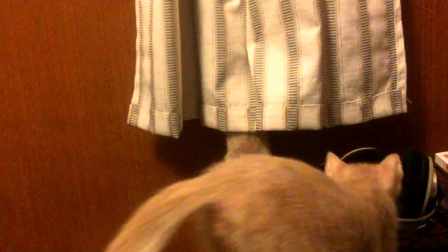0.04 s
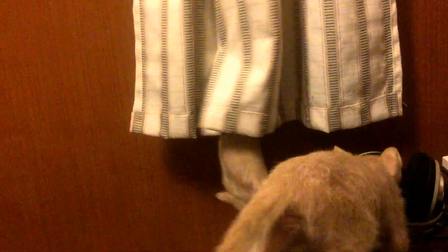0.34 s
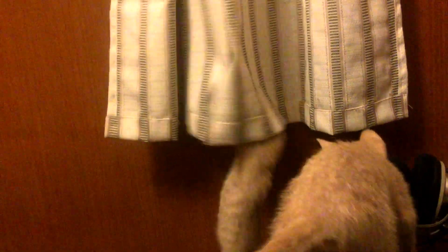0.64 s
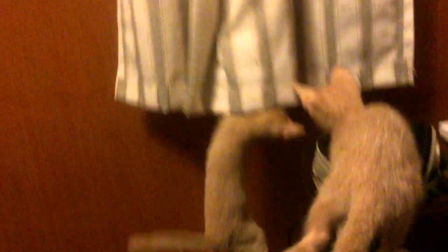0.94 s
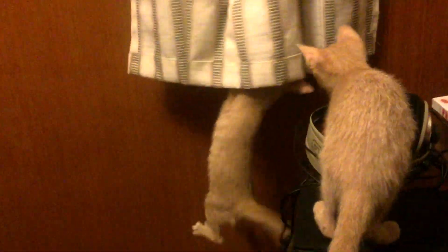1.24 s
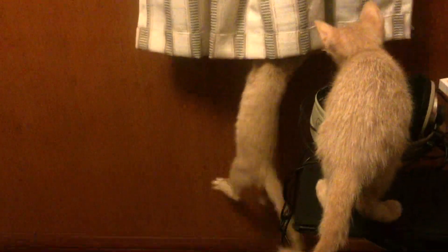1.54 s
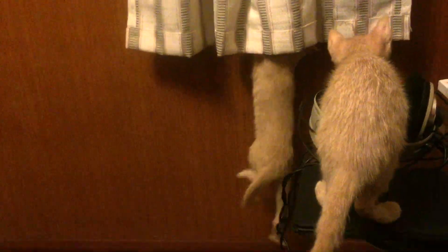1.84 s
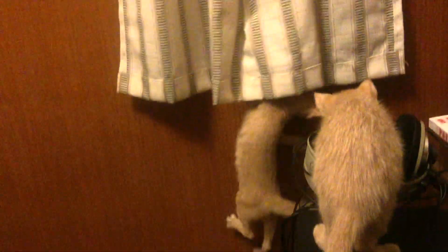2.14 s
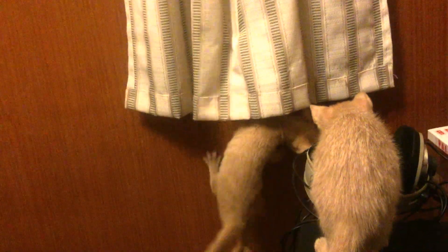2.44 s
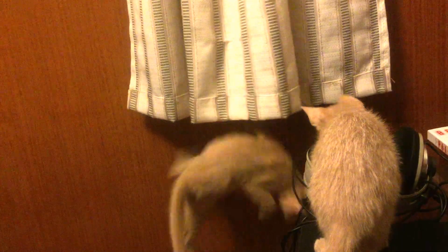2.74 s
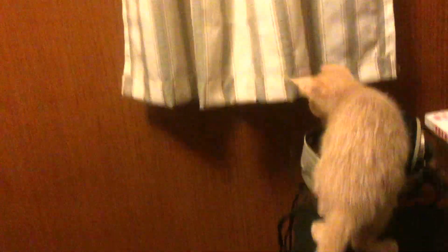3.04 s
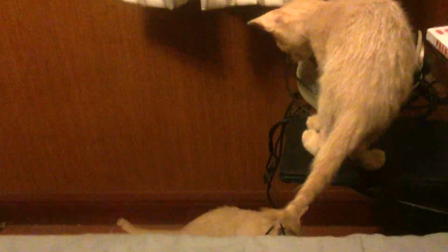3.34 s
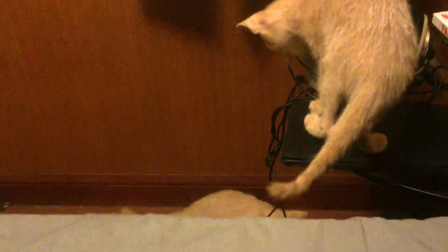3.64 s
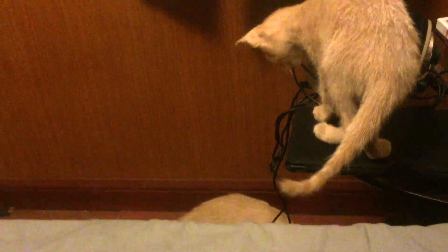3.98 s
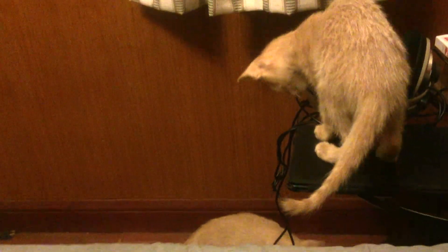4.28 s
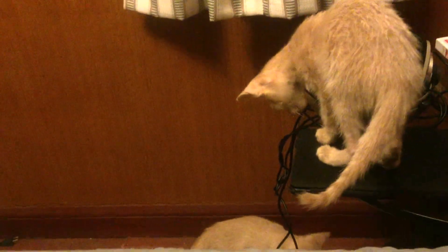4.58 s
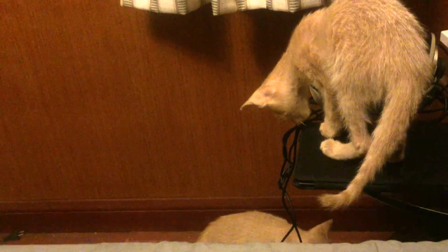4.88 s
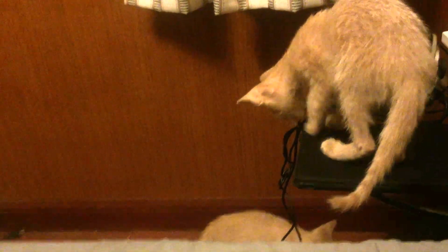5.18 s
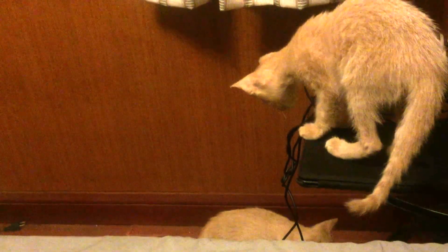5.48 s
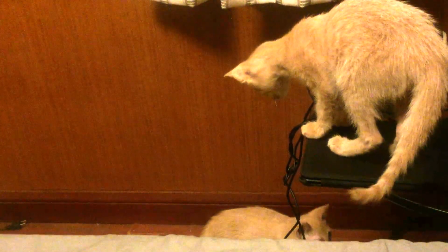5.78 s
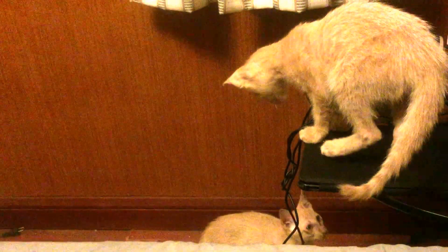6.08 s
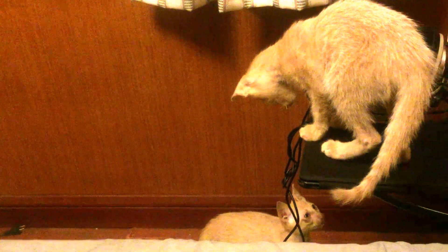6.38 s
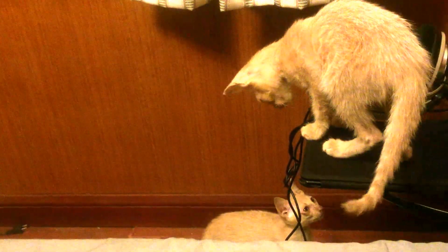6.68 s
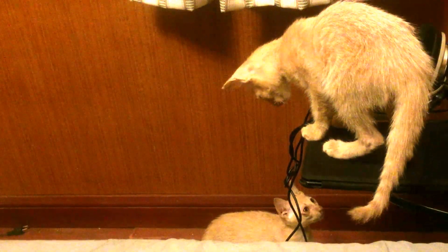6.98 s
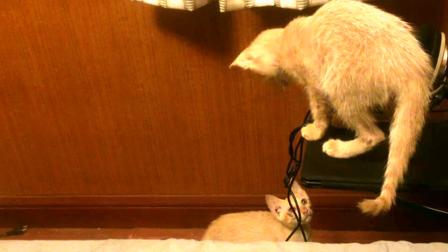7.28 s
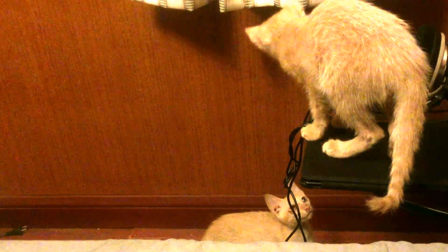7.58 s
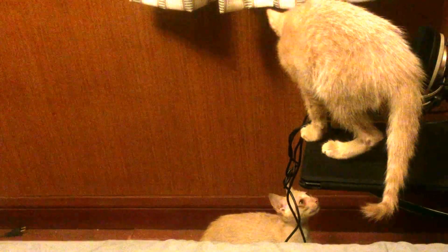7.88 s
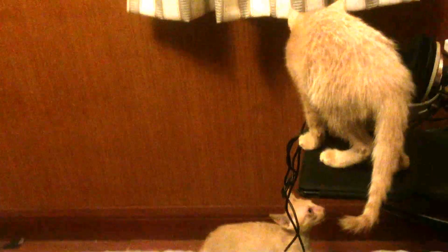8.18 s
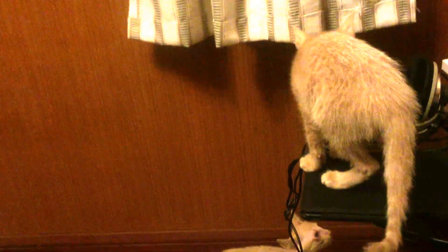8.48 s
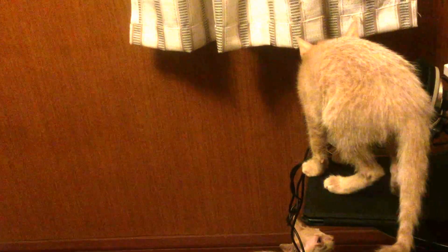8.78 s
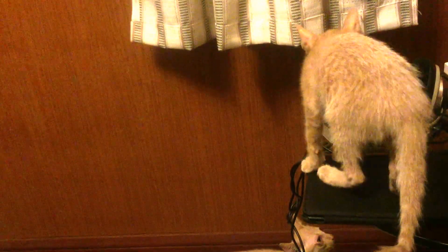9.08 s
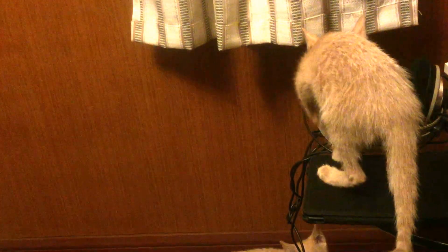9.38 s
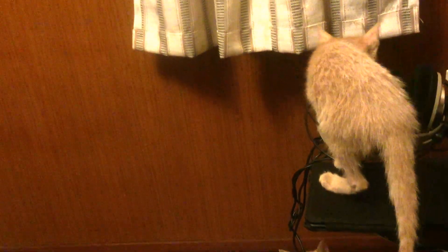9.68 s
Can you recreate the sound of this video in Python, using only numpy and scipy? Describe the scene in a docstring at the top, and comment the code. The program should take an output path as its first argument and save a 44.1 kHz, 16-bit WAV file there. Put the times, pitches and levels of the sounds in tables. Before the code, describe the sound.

A kitten's claws pluck and rip at a curtain, it thuds onto floorboards, and a cat later gives one faint trill in a quiet room.

```python
"""A small room hums. A paw pads on the floor, fur rustles, and a kitten hangs from a curtain in front
of a wooden door: its body bumps the door, its claws pluck threads and rip along the cloth, and small
dry ticks sound close by. At about 3 s it lets go and thuds down, ringing the floorboards. At 5.6 s a
cat gives one soft rising trill, a tone chopped by a flutter in its throat, then shifts about."""
import sys
import numpy as np
from scipy import signal
from scipy.fft import rfft, irfft
from scipy.io import wavfile

SR = 44100
rng = np.random.default_rng(int(sys.argv[2]) if len(sys.argv) > 2 else 0)


def wav_record(signal):
    """Record a signal, one row per channel, as 16-bit PCM in the file named by sys.argv[1]."""
    frames = np.transpose(np.atleast_2d(signal))
    bounded = np.clip(frames, -1, 1)
    # unit amplitude maps onto the largest positive 16-bit level
    quanta = np.round(bounded * 32767).astype(np.int16)
    wavfile.write(sys.argv[1], SR, quanta)


N = 433503
TIME = np.arange(N) / SR


def gain_of(db):
    """Decibels to amplitude."""
    return 10 ** (np.asarray(db) / 20)


def unit_rms(x):
    """Scales to rms 1."""
    return x / np.sqrt(np.mean(x ** 2) + 1e-20)


def curve_at(points, hz, peaks=()):
    """Reads a curve on a log-frequency axis, with peaks and dips on top."""
    point_hz, value = np.transpose(points)
    bumps = sum(db / (1 + (2 * (hz - centre) / width) ** 2) for centre, width, db in peaks)
    return np.interp(np.log(hz + 1), np.log(point_hz + 1), value) + bumps


def add(mix, start, sound):
    """Lays a sound into the mix at a start in seconds."""
    part = mix[round(start * SR):][:len(sound)]
    part += sound[:len(part)]


def eq_impulse(points, peaks=(), size=4096):
    """The minimum-phase impulse response of an EQ curve."""
    hz = abs(np.fft.fftfreq(size, 1 / SR))
    log_gain = np.log(gain_of(curve_at(points, hz, peaks)))
    return np.fft.ifft(np.exp(np.conj(signal.hilbert(log_gain)))).real[:size // 2]


def through(x, impulse):
    """Convolves and keeps the length."""
    return signal.fftconvolve(x, impulse)[:len(x)]


def band(x, low_hz, high_hz):
    """Band-pass."""
    edges = [low_hz, min(high_hz, .45 * SR)]
    return signal.sosfilt(signal.butter(2, edges, "band", fs=SR, output="sos"), x)


# Rumble and hiss. Each row: frequency in Hz, level in dB per Hz.
AIR_EQ = [(20, -114), (38, -102), (52, -90), (82, -87), (130, -98.5), (280, -103), (500, -109),
          (1100, -112), (2800, -110), (4800, -114.5), (7200, -119.5), (9000, -118.5), (12000, -122.5),
          (15500, -125)]
# Peaks and dips in the hiss. Each row: centre in Hz, width in Hz, gain in dB.
HISS_PEAKS = [(3600, 160, -2.5), (4070, 150, 6.5), (4950, 400, -8.5), (5470, 790, 11), (10230, 640, -2)]
# Two motors, the slower with an overtone. Each row: frequency in Hz, rms level in dB.
MOTOR_HUM = [(86.7, -69), (100, -70), (173.4, -91)]
def room_tone(drift=0.092):
    """The bed: room rumble, thin microphone hiss and two motors beating against each other."""
    air = through(rng.standard_normal(N), eq_impulse(AIR_EQ, HISS_PEAKS, size=16384)) * np.sqrt(SR / 2)
    knots = np.linspace(0, TIME[-1], 40)
    hum = np.zeros(N)
    for hz, db in MOTOR_HUM:
        phase = np.interp(TIME, knots, 2 * drift * rng.standard_normal(len(knots)))
        wobble = np.interp(TIME, knots, 1 + drift * rng.standard_normal(len(knots)))
        hum += gain_of(db) * np.sqrt(2) * np.sin(2 * np.pi * hz * TIME + phase) * wobble
    return air + hum


def thud(modes, db, hard_hz, scuff_db, ring_share=0.88, scuff_s=0.0099, rise_s=0.0043):
    """A padded blow rings the wood's modes, rolled off above hard_hz, with a short scuff of fur."""
    t = TIME[:SR // 2]
    ring = np.zeros(len(t))
    for hz, mode_db, t60 in modes:
        decay = gain_of(mode_db - 60 * t / (t60 * ring_share))
        ring += decay * np.sin(2 * np.pi * hz * t) / (1 + (hz / hard_hz) ** 2)
    scuff = unit_rms(band(rng.standard_normal(len(t)), 238, 1015)) * np.exp(-t / scuff_s)
    return gain_of(db) * ring * (1 - np.exp(-t / rise_s)) + gain_of(scuff_db) * scuff


# The ring of the boards. Each row: frequency in Hz, gain in dB, t60 in seconds.
FLOOR_MODES = [(65.5, -16, 0.36), (83.6, -12.5, 0.16), (107.2, -6, 0.21), (141.4, -4, 0.22),
               (209.3, -6, 0.23), (268, -9, 0.19), (289.3, -1.5, 0.2), (334, -11, 0.15), (420, -9.5, 0.23),
               (537, -13.5, 0.12), (630, -23.5, 0.21), (860, -10, 0.055)]
# Hits on the floor. Each row: start in seconds, gain in dB, hardness in Hz, scuff in dB,
# share of the ring time (a resting paw damps the boards).
FLOOR_HITS = [(.118, -43.5, 600, -59.5, 0.32), (3.066, -47, 900, -48, 0.8), (3.081, -15.5, 75, -44.5, .9),
              (3.1068, -21.5, 800, -38.5, 0.9), (3.1195, -15, 330, -45.5, 0.5),
              (3.143, -32, 300, -53, 0.89), (3.177, -55, 250, -54, .43), (3.346, -29.5, 600, -44.5, 0.18),
              (3.354, -19.5, 252, -76, 0.063), (3.722, -38, 242, -77, 0.17), (6.03, -47, 350, -57.5, 0.44),
              (7.913, -57, 600, -65.5, .6), (7.946, -52.5, 550, -70, 0.66), (8.133, -64, 900, -62.5, 0.76),
              (9.73, -60, 299, -77, 0.86)]
def floor_thuds():
    """Paws and body strike the floorboards: light steps and one heavy landing."""
    out = np.zeros(N)
    for start, *hit in FLOOR_HITS:
        add(out, start, thud(FLOOR_MODES, *hit))
    return out


def fibre_slips(count, fibres_per_s=5000, catches_per_s=130, catch_db=14, rub=0.31, clump_db=0.6):
    """Raw friction: fibres slip in little clumps, and now and then a whole thread gives way."""
    chance, noise = rng.random(SR)[:count], rng.standard_normal(SR)[:count]
    sizes = gain_of(np.minimum(rng.exponential(1, SR)[:count], 4))
    clumps = np.clip(unit_rms(band(rng.standard_normal(SR), 25.04, 200)), -2, 2)[:count]
    grains = unit_rms(np.sign(noise) * sizes * (chance < fibres_per_s / SR))
    friction = unit_rms((grains + rub * noise) * gain_of(-clump_db * clumps))
    catches = gain_of(catch_db) * np.sign(noise) * (chance < catches_per_s / SR)
    return unit_rms(friction + catches)


def scrape(length, db, swell_db, from_hz, to_hz, skirt_db, eq, peaks=(),
           attack_s=0.0046, release_db_per_s=599, arch_db=1):
    """Slipping fibres rasp in a band that glides with the stroke's speed; it bites and stops fast."""
    t = TIME[:SR // 3]
    progress = np.minimum(t / length, 1)
    level_db = db - swell_db * (1 - progress) - arch_db * (2 * progress - 1) ** 2
    level_db -= release_db_per_s * np.maximum(t - length, 0)
    centre_hz = from_hz * (to_hz / from_hz) ** (progress ** 2.1)  # holds at first, glides late
    hz, frame_s, spectra = signal.stft(fibre_slips(len(t)), SR, nperseg=256)
    octaves = np.log2((hz[:, None] + 50) / np.interp(frame_s, t, centre_hz))
    sweep = gain_of(-skirt_db * np.hypot(octaves, .5))
    colour = gain_of(curve_at(eq, hz, peaks))[:, None]
    sweep /= np.sqrt(np.mean((sweep * colour) ** 2, axis=0))  # even power along the glide
    rasp = signal.istft(spectra * sweep, SR)[1][:len(t)]
    return through(rasp, eq_impulse(eq, peaks)) * gain_of(level_db) * (1 - np.exp(-t / attack_s))


# The colour of fur. Each row: frequency in Hz, gain in dB.
FUR_EQ = [(120, -5), (250, 8.5), (550, 10), (800, -2.5), (1200, -3), (2500, 0.5), (4500, -7.5),
          (6500, -3.5), (8000, -17), (16000, -22)]
# Faint movements. Each row: start in seconds, length in seconds, midway level in dB, centre in Hz.
FUR_RUSTLES = [(0.39, 0.028, -58.5, 3300), (0.486, 0.15, -69.5, 3440), (4.524, 0.099, -73, 1300),
               (8.017, 0.043, -70, 2000), (8.548, 0.03, -58.5, 2730), (8.633, 0.061, -67.5, 2300),
               (8.64, .1, -72.5, 550), (8.886, 0.024, -62, 2670), (9.633, 0.068, -70.5, 2500)]
def fur_rustles(fade_db=6, skirt_db=8.5):
    """Fur brushes as the cats shift, each rustle dying away at a steady pitch."""
    out = np.zeros(N)
    for start, length, db, hz in FUR_RUSTLES:
        add(out, start, scrape(length, db - fade_db / 2, -fade_db, hz, hz, skirt_db, FUR_EQ))
    return out


# The ring of the door. Each row: frequency in Hz, gain in dB, t60 in seconds.
DOOR_MODES = [(60.3, -1.5, 0.1318), (81.1, -2.5, 0.313), (102.3, -5, 0.12), (146, -21.5, 0.19),
              (221, -11, 0.17), (252, -14.5, 0.09), (310.8, -18, 0.087)]
# Hits on the door. Each row: start in seconds, gain in dB, hardness in Hz, scuff in dB.
DOOR_HITS = [(.393, -47.5, 300, -51), (0.639, -33.5, 110, -76), (.661, -38, 240, -72),
             (1.56, -49, 150, -67), (1.6, -47.5, 250, -60), (1.978, -38.5, 80, -84),
             (2.003, -33.5, 90, -71), (2.063, -45.5, 140, -80), (2.818, -43.5, 890, -46),
             (8.422, -44, 80, -75), (9.615, -51, 100, -80)]
def door_bumps():
    """A soft body bumps the wooden door, which answers with a low boom."""
    out = np.zeros(N)
    for start, *hit in DOOR_HITS:
        add(out, start, thud(DOOR_MODES, *hit))
    return out


# Claw catches. Each row: start in seconds, ring peak in dB, ring pitch in Hz, ring t60 in seconds,
# crack peak in dB.
CLAW_SNAGS = [(.3931, -36.5, 660, 0.0015, -28), (.615, -36, 1120, 0.017, -56),
              (0.7658, -28.5, 1560, .009, -38), (0.7754, -27, 2220, 0.0046, -20),
              (.873, -33.5, 3130, 0.0069, -26), (1.5959, -46.5, 1180, .016, -43),
              (2.1061, -23.5, 1400, 0.0084, -35), (2.239, -38, 3200, 0.0087, -43),
              (2.527, -36, 1460, 0.017, -50), (2.573, -33, 1350, .012, -56),
              (2.7023, -36, 1314, 0.018, -47), (2.816, -23.5, 326, 0.0093, -17.5),
              (2.8194, -45, 700, .0075, -26.5), (3.3445, -34.5, 3680, 0.0015, -43.5)]
def claw_snags(crack_s=0.0012, fray=0.64, rise_s=0.00052):
    """A claw plucks a thread of the taut cloth or clicks on wood: a crack and a brief ring."""
    t = TIME[:4096]
    out = np.zeros(N)
    for start, ring_db, hz, t60, crack_db in CLAW_SNAGS:
        ring = np.sin(2 * np.pi * hz * t) * gain_of(-60 * t / t60) * (1 - np.exp(-t / rise_s))
        fraying = fray * rng.standard_normal(len(t)) * np.exp(-t / crack_s)
        crack = band((t == 0) + fraying, 1100, 9300)
        add(out, start, gain_of(ring_db) * ring / abs(ring).max())
        add(out, start, gain_of(crack_db) * crack / abs(crack).max())
    return out


# The colour of the cloth. Each row: frequency in Hz, gain in dB.
CLOTH_EQ = [(150, -11), (400, -8.5), (620, -1.5), (800, -13.5), (1050, 4.5), (2000, -0.5), (3300, -1.5),
            (4500, -3), (6200, -0.5), (7300, -5.5), (8500, 0.5), (10300, -5.5), (12500, -2.5),
            (16000, -7.5)]
# Resonances and dips under the claws. Each row: centre in Hz, width in Hz, gain in dB.
CLOTH_RESONANCES = [(1120, 60, -1), (1300, 180, 3.5), (1470, 100, 2), (1750, 23, -2.5), (2856, 83, 8.5),
                    (3374, 76, 6.5), (3526, 60, 4), (6020, 258, -2)]
# Rips. Each row: start in seconds, length in seconds, level swelled to in dB, swell in dB, opening
# centre in Hz, closing centre in Hz, slope of the band's skirts in dB per octave, flap level in dB.
CLAW_STROKES = [(0.609, .11, -43, 3, 2550, 1980, 8.5, -45), (0.756, 0.11, -35, 6.5, 5100, 7650, 7, -37.5),
                (1.586, 0.017, -55.5, -2, 2600, 2880, 12, -62.5),
                (2.105, 0.087, -46, 5, 1530, 2660, 7.5, -49.5), (2.224, 0.016, -40, 6, 2700, 2870, 13, -60),
                (2.291, 0.052, -46.5, 1.5, 2930, 2970, 9.5, -59.5),
                (2.373, .075, -59, 5, 2350, 2000, 14, -77), (2.475, 0.11, -44.5, 5, 2040, 1140, 12.5, -68),
                (2.699, 0.046, -48.5, -0.5, 1900, 1600, 10, -53),
                (2.825, 0.057, -24, 19, 5460, 1580, 5, -55)]
def claw_rips(echo_s=0.00423, echo_db=-16):
    """Claws drag through the curtain and jerk it; returns the rasps and the flaps as two stems."""
    rasps, flaps = np.zeros((2, N))
    for start, *stroke, flap_db in CLAW_STROKES:
        rasp = scrape(*stroke, CLOTH_EQ, CLOTH_RESONANCES)
        add(rasps, start, rasp)
        add(rasps, start + echo_s, -gain_of(echo_db) * rasp)  # a near surface combs the rasp
        add(flaps, start, curtain_flap(flap_db))
    return rasps, flaps


# The low whump of the curtain. Each row: frequency in Hz, gain in dB.
FLAP_EQ = [(20, -43), (45, -5.5), (70, 2.5), (110, 0.5), (160, -13.5), (215, -1), (280, -9), (450, -19.5),
           (900, -22), (3000, -59.5)]
def curtain_flap(db, rise_s=0.011, fade_db_per_s=128):
    """The heavy cloth pushes air as a stroke jerks it, then settles."""
    t = TIME[:SR // 2]
    air = unit_rms(through(rng.standard_normal(len(t)), eq_impulse(FLAP_EQ)))
    return air * gain_of(db - fade_db_per_s * t) * (1 - np.exp(-t / rise_s))


# The colour of a thin shell. Each row: frequency in Hz, gain in dB.
SHELL_EQ = [(150, -39), (400, -6), (550, 3.5), (700, -15.5), (920, 7.5), (1200, -7.5), (1600, 2.5),
            (2400, -4), (2750, -20), (4500, -20.5), (12000, -33)]
# Close, dry ticks and knocks. Each row: start in seconds, peak in dB, treble limit in Hz.
CLOSE_TICKS = [(1.01, -51, 6000), (1.045, -57, 6000), (1.070, -57, 5960), (1.097, -52.5, 6000),
               (1.337, -52, 6000), (3.251, -34.5, 14000), (3.2713, -40.5, 8000), (3.3, -44, 4930),
               (3.385, -40.5, 4976), (3.546, -50, 5000), (3.755, -56.5, 3000), (4.507, -59, 4000),
               (4.526, -52.5, 3000), (5.31, -40.5, 5100), (6.022, -53, 750), (6.03, -56.5, 700),
               (6.064, -55, 750)]
def close_ticks(lag_s=0.0018, size=4096):
    """Ticks cross a thin shell as bending waves, treble first; softer contacts are duller."""
    hz = np.fft.rfftfreq(size, 1 / SR)
    dispersion = np.exp(-4j * np.pi * lag_s * np.sqrt(1000 * hz))  # lag_s is the delay at 1 kHz
    shell = irfft(rfft(eq_impulse(SHELL_EQ), size) * dispersion)[:size // 2]
    out = np.zeros(N)
    for start, db, limit_hz in CLOSE_TICKS:
        tick = band(shell, 100, limit_hz)
        add(out, start - lag_s / 4, gain_of(db) * tick / abs(tick).max())
    return out


# The envelope of the call. Each row: time in seconds, level in dB.
TRILL_ENVELOPE = [(5.6, -80), (5.626, -58.5), (5.654, -56.5), (5.814, -68), (5.844, -59.5), (5.858, -66),
                  (5.88, -84)]
def cat_trill(top_hz=528, dip_hz=396, dip_at_s=5.662, sag_s=0.0358, climb_s=0.083,
              flutter_hz=62, flutter_depth=0.53, jitter=0.055, open_db=14, shut_db=24):
    """A closed-mouth call: a nearly pure tone dips and rises, chopped by a flutter in the throat."""
    times, level_db = np.transpose(TRILL_ENVELOPE)
    t = np.arange(times[0], times[-1], 1 / SR)
    closing = np.linspace(0, 1, len(t)) ** 3  # overtones fade and the flutter calms at the end
    glide_s = np.where(t < dip_at_s, sag_s, climb_s)
    hz = top_hz + (dip_hz - top_hz) * np.exp(-((t - dip_at_s) / glide_s) ** 2)
    rolloff_db = open_db + (shut_db - open_db) * closing
    waver, uneven = (unit_rms(band(row, 21, 99))[:len(t)] for row in rng.standard_normal((2, SR)))
    phase = 2 * np.pi * np.cumsum(hz * (1 + jitter * waver)) / SR
    voice = sum(gain_of(-rolloff_db * k ** 0.32) * np.sin((k + 1) * phase) for k in range(3))
    flutter_phase = 2 * np.pi * np.cumsum(flutter_hz * (1 + 0.19 * uneven)) / SR
    chop = 1 + flutter_depth * (1 - closing) * np.sin(flutter_phase)
    out = np.zeros(N)
    add(out, times[0], gain_of(np.interp(t, times, level_db)) * unit_rms(voice * chop))
    return out


# The room's decay. Each row: frequency in Hz, t60 in seconds.
ROOM_DECAY = [(100, 0.45), (400, 0.17), (1500, 0.28), (4000, 0.3), (8000, 0.25), (15000, 0.29)]
def room_reverb(x, predelay_s=0.0044, echoes_per_s=3000):
    """Scattered echoes of a small furnished room, each band dying at its own speed."""
    taps = rng.choice([-1., 1.], SR) * (rng.random(SR) < echoes_per_s / SR) * (TIME[:SR] > predelay_s)
    hz, t, spectra = signal.stft(taps, SR)
    decay = gain_of(-60 * t / curve_at(ROOM_DECAY, hz)[:, None])
    tail = signal.istft(spectra * decay, SR)[1]
    return through(x, tail / np.linalg.norm(tail))


def scene(scrape_send_db=-7.0, snag_send_db=-9.5, wood_send_db=-8.0, trill_send_db=-3.5):
    """The mono mix with its reverb sends; flaps, ticks and room tone stay dry."""
    rasps, flaps = claw_rips()
    scrapes = rasps + fur_rustles()
    snags = claw_snags()
    wood = floor_thuds() + door_bumps()
    trill = cat_trill()
    reverb = room_reverb(gain_of(scrape_send_db) * scrapes + gain_of(snag_send_db) * snags
                         + gain_of(wood_send_db) * wood + gain_of(trill_send_db) * trill)
    return (scrapes + flaps + snags + wood + trill + reverb + close_ticks() + room_tone())[None]


def record(dry, low_cut_hz=44, high_cut_hz=16000):
    """A small microphone loses the deepest bass; a steep low-pass trims the top."""
    thin = signal.sosfilt(signal.butter(4, low_cut_hz, "high", fs=SR, output="sos"), dry)
    low_pass = signal.firwin(511, high_cut_hz, window=("kaiser", 9), fs=SR)
    return signal.oaconvolve(thin, low_pass[None], "same")


dry = scene()
out = record(dry)
wav_record(out)
```